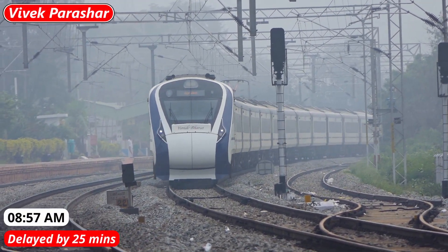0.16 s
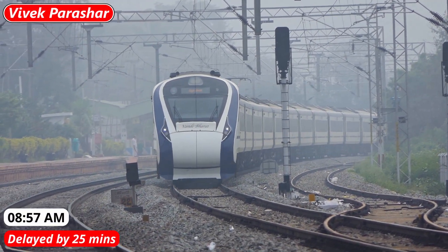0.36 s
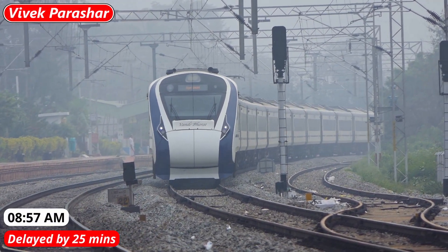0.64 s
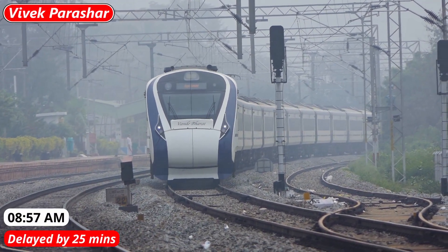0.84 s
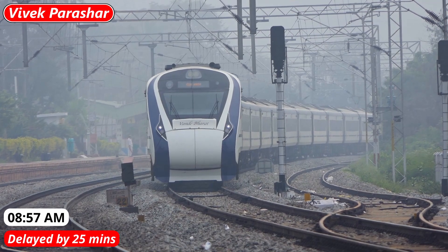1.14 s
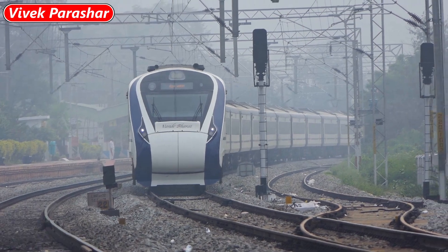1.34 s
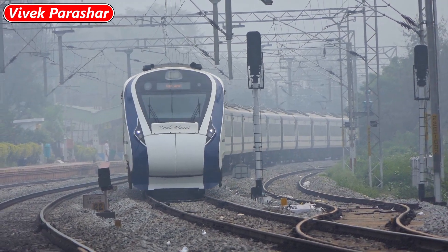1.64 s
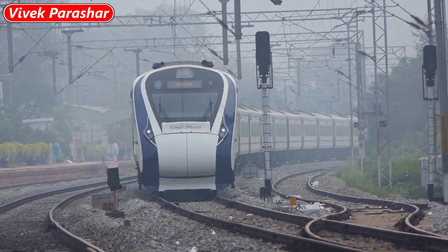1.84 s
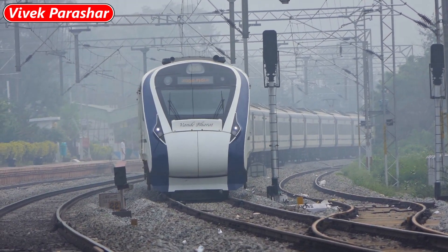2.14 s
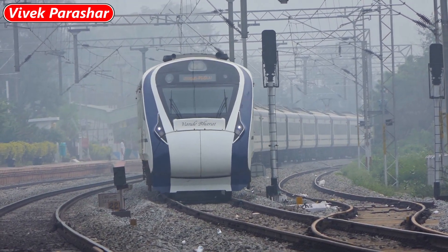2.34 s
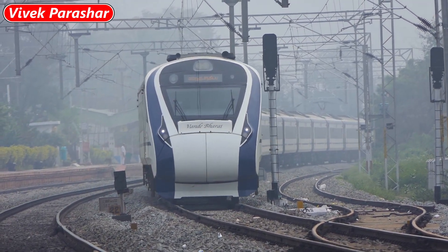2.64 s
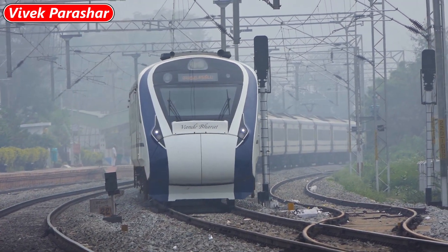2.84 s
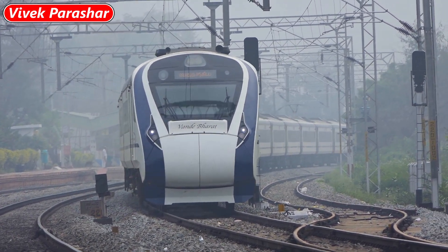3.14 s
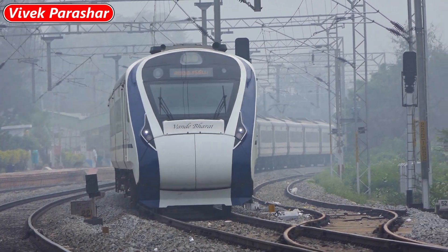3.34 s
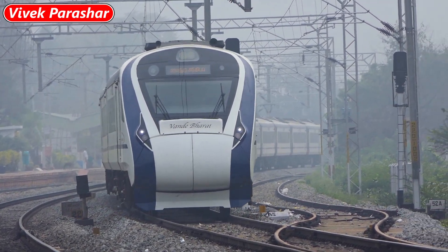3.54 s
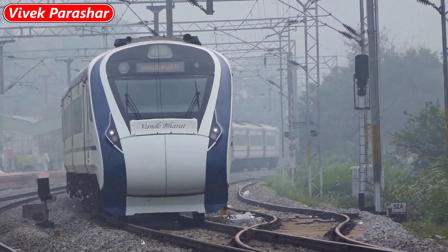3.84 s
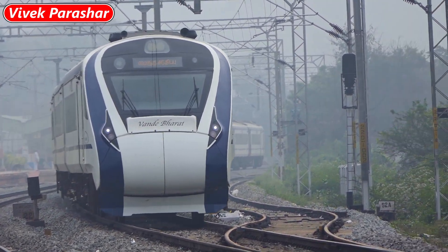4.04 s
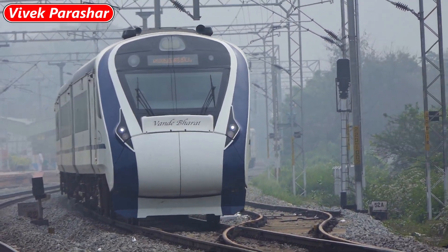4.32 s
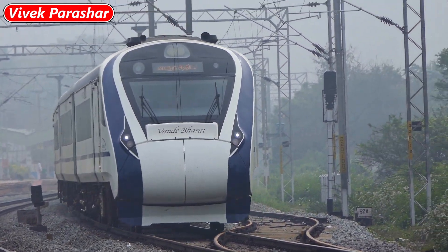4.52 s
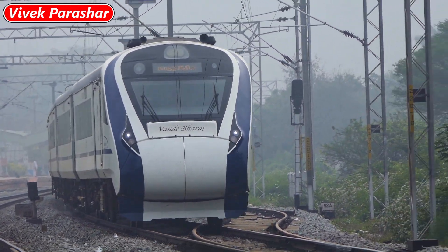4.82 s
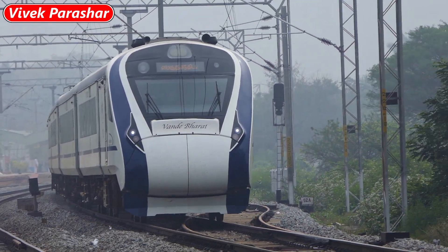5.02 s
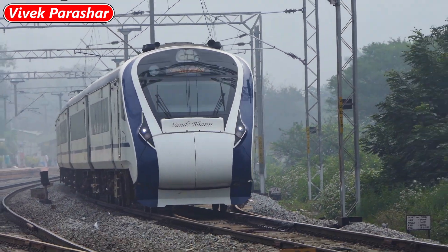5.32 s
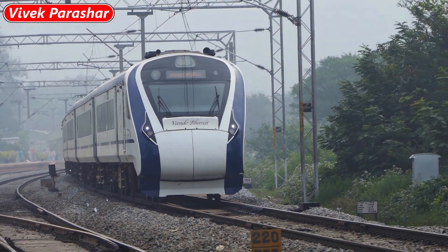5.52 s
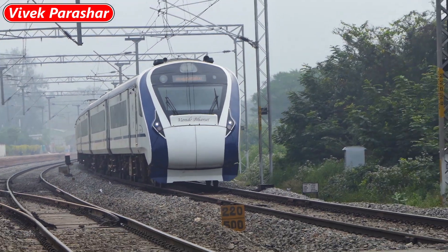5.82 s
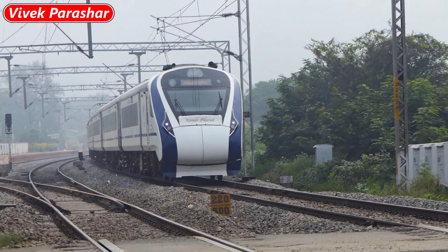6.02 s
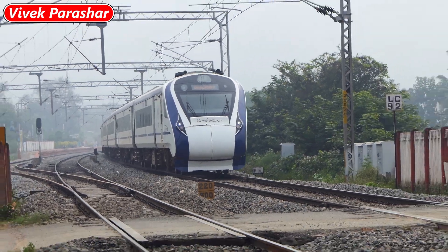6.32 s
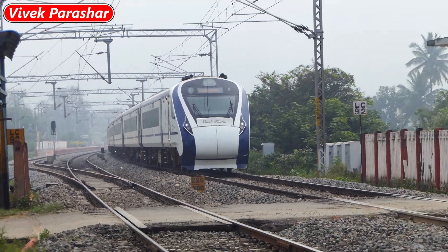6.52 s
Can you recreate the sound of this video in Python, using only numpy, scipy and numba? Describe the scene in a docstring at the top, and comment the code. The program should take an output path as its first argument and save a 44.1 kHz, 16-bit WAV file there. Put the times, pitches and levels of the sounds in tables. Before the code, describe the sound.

An approaching electric train sounds two air-horn blasts, the second louder and longer, with wheels rumbling and rails hissing between them.

```python
"""Beside the track on a railway curve: an electric train nears and sounds two air-horn blasts.
Each starts with a squeak of air, then the diaphragm snaps shut once a cycle; masts, trees and walls
throw the sound back. Between the blasts the wheels rumble, cross points, scuff the rails and thud
over joints, and the rails hiss. A gain control ducks everything else while the horn sounds."""
import sys
import numpy as np
from scipy import signal
from scipy.fft import rfft, irfft, next_fast_len
from scipy.io import wavfile
from scipy.ndimage import uniform_filter1d, map_coordinates
from numba import njit

SR = 44100
rng = np.random.default_rng(int(sys.argv[2]) if len(sys.argv) > 2 else 0)


def dump_mix(stems):
    """Bounce the given channels to the path in sys.argv[1] as a 16-bit WAV at rate SR."""
    frames = np.atleast_2d(stems).T  # one column per channel
    limited = np.clip(frames, -1, 1)  # hard clip at full scale
    pcm = np.round(limited * 32767).astype(np.int16)
    wavfile.write(sys.argv[1], SR, pcm)


N = 294147
TIME = np.arange(N) / SR
TRAIN_M_PER_S, SOUND_M_PER_S = 20, 343
PASS_S, ASIDE_M = 7.7, 7.5  # closest approach
LEAD_S, TAIL_S = .025, .12  # margins round a blast

# rolling noise spectra: f/Hz, relative density/dB
RUMBLE = [(15, -51), (25, -25.5), (92, 2), (157, 1), (230, -2.5), (281, -2.5), (372, -11), (403, -19.5),
          (472, -11), (600, -50), (780, -53), (1320, -120)]
ROAR = [(240, -18), (400, 0), (477, -11), (596, -9.5), (810, 2.5), (1130, -9), (1190, -2), (1700, -3.5),
        (2500, -18), (3250, -40.5), (5500, -120)]
HISS = [(1180, -36), (2000, -3), (2370, -9.5), (2700, -5), (3670, -8), (4400, -10), (5000, -7),
        (7740, -22.5), (10700, -31), (15500, -51)]
RINGING = [(1180, -42), (2000, -2), (2140, -1), (2330, -34), (2440, -9.5), (2790, -12), (2890, -33),
           (3150, -11.5), (3580, -24), (4790, -27), (5400, -7), (6640, -25), (8010, -21), (10000, -16),
           (15500, -35)]
# their envelopes: start level/dB, slope/(dB/s), swell on the points/dB, fall time/s
RUMBLE_LEVEL = (-53, 1.2, 2, 3.5)
ROAR_LEVEL = (-52, -0.1, 5, 0.66)
HISS_LEVEL = (-55, -0.95, 7, 0.05)
RINGING_LEVEL = (-66.5, 1.04, 2.5, 10)
# rolling noise, left to right: f/Hz, coherence
COHERENCE = [(30, .55), (70, 0.29), (150, 0.84), (400, 0.85), (1500, 0.6), (5000, 0.91), (12000, 0.8)]
# rolling noise, left channel: f/Hz, gain/dB
LEFT_GAIN = [(30, -8), (80, -1.5), (170, 2), (500, 2.5), (2000, 3), (10000, 1)]
# flange rubs: t/s, length/s, f/Hz, width/Hz, level/dB
SCUFFS = [(3.108, 0.072, 1300, 897, -48.5), (3.30, 0.076, 2920, 1800, -53), (3.482, 0.056, 1730, 300, -55),
          (3.763, 0.076, 1046, 344, -54), (3.749, 0.69, 3200, 72, -68.5), (3.756, 1.64, 5400, 260, -70.5),
          (4.036, 0.14, 1730, 250, -53), (4.577, 0.15, 1003, 168, -49)]
# rail joints: t/s, level/dB
JOINTS = [(4.016, -34), (4.127, -31), (4.341, -35.5), (4.425, -36)]
# reflectors, flat in pitch if beside the train: pitch factor, delay/s, gain/dB, t60/s, tilt/(dB/oct)
ECHOES = [(1, .045, -19, .08, 0), (1, .12, -14.5, .1, -.8), (1, .27, -22.5, .35, -4),
          (.998, .54, -35, .6, -5), (.99, .45, -45.5, 3.2, -5.5), (.978, .6, -48.5, 3.6, -5.5),
          (.96, .7, -50.5, 3.2, -5.5)]
# filters for the echoes and the hiss that roughens them: f/Hz, gain/dB
ECHO_COLOUR = [(400, 4), (800, 5.5), (1600, 4.5), (4000, 0.5), (8000, -1.5), (15000, -16)]
ECHO_SCATTER = [(200, -19), (600, -23.5), (1000, -17), (1600, -9.5), (2600, -19), (6000, -34), (15000, -60)]
# first notch of the ballast bounce, falling as the train nears: t/s, f/Hz
GROUND_NOTCH = [(4.8, 5400), (5.2, 4340), (5.55, 3550), (5.85, 2775), (6.2, 2296), (6.67, 1854)]
# ballast reflection: f/Hz, gain/dB
BALLAST = [(400, -3.5), (800, -40.5), (1300, 0), (6000, -5.5), (15000, -20)]
# throat turbulence: f/Hz, gain/dB
THROAT = [(200, -5), (700, 11), (1400, 14.5), (2500, 8.5), (4500, 4), (8000, 5), (11000, 1), (15000, -26)]
# air squeaks: t/s, length/s, f/Hz, level/dB, relative half-pitch line/dB
SQUEAKS = [(0.186, 0.067, 4245, -26.5, -22.5), (4.798, 0.062, 4300, -28, -10.5)]
# horn partials: multiple, relative level far and head-on/dB, near and aslant/dB
PARTIALS = [(1, -9.5, -8.5), (2, 1, 1.5), (3, -7, -6.5), (4, -2, -8.5), (5, -4, -9), (6, -2, -13),
            (7, -4, -12), (8, -12, -18.5), (9, -7, -15), (10, -9, -15), (11, -6, -16), (12, -13, -18.5),
            (13, -15.5, -21.5), (14, -13, -18.5), (15, -12.5, -20), (16, -24.5, -29), (17, -15.5, -20.5),
            (18, -19, -23.5), (19, -29, -33.5), (20, -22.5, -24), (21, -21.5, -24.5), (22, -24.5, -27),
            (23, -21, -22.5), (24, -21, -24), (25, -25.5, -23.5), (26, -29.5, -31.5), (27, -26.5, -28.5),
            (28, -30.5, -27), (29, -34, -33), (30, -44.5, -29), (31, -33.8, -33), (32, -45, -42),
            (33, -45, -40.8), (34, -45.5, -43), (35, -42.7, -34), (36, -47, -50), (37, -49, -42),
            (38, -54, -46)]
# horn blasts: t/s, length/s, settled f/Hz, level/dB, attack/s, swell/dB, fade/(dB/s),
# tilt/(dB/oct), tilt rate/(dB/oct/s)
BLASTS = [(.240, 1.209, 400.5, 1.5, 0.0014, 7, 2.4, 0.22, 0.77),
          (4.841, 2.05, 404.6, 10.5, .0035, 13, 4, -1.25, 1.2)]


def gain_of(db):
    return 10 ** (np.asarray(db) / 20)


def unit_rms(x):
    return x / np.sqrt(np.mean(x ** 2) + 1e-20)


def log_interp(points, hz):
    f, value = np.transpose(points)
    return np.interp(np.log(hz + 1), np.log(f + 1), value)


def add(mix, start_s, sound):
    part = mix[max(round(start_s * SR), 0):][:len(sound)]
    part += sound[:len(part)]


def drift(t, rate_hz):
    """Smooth random curve, rms 1."""
    knots = rng.standard_normal(8192)
    return np.interp((t - t[0]) * rate_hz, np.arange(len(knots)), knots) * np.sqrt(3 / 2)


def coloured(x, spectrum):
    size = next_fast_len(x.shape[-1] + SR // 10)
    gain = gain_of(log_interp(spectrum, np.fft.rfftfreq(size, 1 / SR)))
    return irfft(rfft(x, size) * gain, size)[..., :x.shape[-1]]


def delayed(x, delay_s):
    return map_coordinates(x, [np.arange(N) - delay_s * SR], order=3)


def noise_band(t, hz, width_hz):
    angle = 2 * np.pi * hz * t
    return drift(t, width_hz) * np.cos(angle) + drift(t, width_hz) * np.sin(angle)


def stereo_noise(spectrum, patchy_db, flicker_db):
    """Noise with drifting spectral patches and a broadband flicker."""
    frames, hz = N // 256 + 5, np.fft.rfftfreq(1024, 1 / SR)
    a, b, c, d, patches = rng.standard_normal((5, frames, 513))
    patches = unit_rms(uniform_filter1d(uniform_filter1d(patches, 10, 0), 9, 1))
    flicker = drift(np.arange(frames) * 256 / SR, 25)[:, None]
    coherence, left = log_interp(COHERENCE, hz), a + 1j * b
    bins = np.array([left, coherence * left + np.sqrt(1 - coherence ** 2) * (c + 1j * d)])
    bins *= gain_of(log_interp(spectrum, hz) + patchy_db * patches + flicker_db * flicker)
    return unit_rms(signal.istft(bins.transpose(0, 2, 1), nperseg=1024, noverlap=768)[1][:, :N])


def track_drone(start_db=-51, fade_db_per_s=2.5):
    """The track drones while the train is far off."""
    return gain_of(start_db - fade_db_per_s * TIME) * unit_rms(noise_band(TIME, hz=104, width_hz=34))


def approach(start_db, db_per_s, swell_db, fall_s, enter_s=2.63, leave_s=3.73, rise_s=.48):
    """Rolling gain: a steady slope, and a swell as the leading wheels cross the points."""
    on_points = np.clip(np.minimum((TIME - enter_s) / rise_s, 1 - (TIME - leave_s) / fall_s), 0, 1)
    return gain_of(start_db + db_per_s * TIME + swell_db * on_points)


def flange_scuffs():
    """Flanges rub the rails in the curve and set them whining."""
    out = np.zeros(N)
    for start_s, length_s, hz, width_hz, db in SCUFFS:
        t = np.arange(0, length_s, 1 / SR)
        add(out, start_s, gain_of(db) * unit_rms(noise_band(t, hz, width_hz) * np.hanning(len(t))))
    return out


def joint_thuds(hz=131, rise_s=.0048):
    """Each joint gives the wheel a low push that dies in a few cycles."""
    out, t = np.zeros(N), np.arange(SR // 10) / SR
    thud = t / rise_s * np.exp(1 - t / rise_s) * np.sin(2 * np.pi * hz * t)
    for start_s, db in JOINTS:
        add(out, start_s, gain_of(db) * thud)
    return out


def rolling():
    """Rails hiss and ring ahead of the train; bogies rumble, wheels roar."""
    hiss = approach(*HISS_LEVEL) * stereo_noise(HISS, patchy_db=2, flicker_db=1.2)
    ringing = approach(*RINGING_LEVEL) * stereo_noise(RINGING, patchy_db=1.6, flicker_db=.7)
    rumble = approach(*RUMBLE_LEVEL) * stereo_noise(RUMBLE, patchy_db=2, flicker_db=2)
    roar = approach(*ROAR_LEVEL) * stereo_noise(ROAR, patchy_db=2.2, flicker_db=.8)
    left, right = hiss + ringing + rumble + roar + flange_scuffs() + joint_thuds() + track_drone()
    return np.array([coloured(left, LEFT_GAIN), right])


def echoes(blast, partial_db, taps_per_s=2000):
    """Each reflector group returns a dying cloud of taps; long paths lose treble."""
    out, t, start_s = np.zeros((2, N)), np.arange(2 * SR) / SR, blast[0] - LEAD_S
    for pitch_factor, delay_s, db, t60_s, tilt in ECHOES:
        taps = rng.standard_normal((2, len(t))) * (rng.random(len(t)) < taps_per_s / SR)
        mid, side = taps * gain_of(-60 * t / t60_s)
        response = np.array([mid + .3 * side, mid - .3 * side])
        dulled = horn(blast, partial_db, pitch_factor, tilt, count=28)[round(start_s * SR):]
        tail = signal.fftconvolve(dulled[None, :2 * SR], response / np.linalg.norm(response[0]), axes=1)
        for channel in range(2):
            add(out[channel], start_s + delay_s, gain_of(db) * tail[channel])
    return coloured(out, ECHO_COLOUR)


def trackside(direct, mast_db=-25):
    """Direct sound plus ballast and mast bounces; shifting paths make the partials flutter."""
    bounce_s = 1 / np.interp(TIME, *np.transpose(GROUND_NOTCH))
    out = direct - coloured(delayed(direct, bounce_s), BALLAST)  # grazing bounce inverts
    train_m = TRAIN_M_PER_S * (PASS_S - TIME)
    for along_m, aside_m in zip(np.linspace(3, 17, 6), rng.uniform(2, 5, 6)):
        leg_m = np.hypot(train_m - along_m, aside_m)
        detour_m = leg_m + np.hypot(along_m, aside_m) - train_m
        out += gain_of(mast_db) * np.minimum(20 / leg_m, 1.5) * delayed(direct, detour_m / SOUND_M_PER_S)
    return out


def throat_air(tone, gain_db):
    """Turbulence in the horn's throat puffs with each pulse."""
    return gain_of(gain_db) * coloured(tone * rng.standard_normal(N), THROAT)


def air_squeaks(rise_s=.0032, fade_s=.005):
    """Air whistles past the diaphragm before it swings."""
    out = np.zeros(N)
    for start_s, length_s, hz, db, half_db in SQUEAKS:
        t = np.arange(0, length_s, 1 / SR)
        angle = 2 * np.pi * np.cumsum(hz * (1 + .012 * drift(t, 273))) / SR
        lines = [(1.004, 0), (.5, half_db), (.917, -14), (2, -28), (3, -42)]
        whistle = sum(gain_of(line_db) * np.sin(multiple * angle) for multiple, line_db in lines)
        breath = .012 * rng.standard_normal(len(t))
        envelope = np.minimum(t / rise_s, 1) * np.minimum((length_s - t) / fade_s, 1)
        add(out, start_s, gain_of(db) * unit_rms(whistle + breath) * envelope)
    return out


def blowing(blast, sharp_hz=19.5, settle_s=.056, build_s=.078, release_db_per_s=420):
    """The horn starts sharp and dull, settles as pressure builds, and dies when the valve shuts."""
    start_s, length_s, settled_hz, db, attack_s, swell_db, fade_db_per_s, tilt, tilt_rate = blast
    t = np.arange(-LEAD_S, length_s + TAIL_S, 1 / SR)
    held_s, released_s = np.maximum(t, 0), np.maximum(t - length_s, 0)
    snapping = .5 + .5 * np.tanh(t / (2 * attack_s))
    slack = np.exp(-held_s / build_s)  # pressure still to build
    bearing = np.arctan2(ASIDE_M, TRAIN_M_PER_S * (PASS_S - start_s - t))
    doppler = 1 - TRAIN_M_PER_S / SOUND_M_PER_S * (1 - np.cos(bearing))
    hz = (settled_hz + sharp_hz * np.exp(-held_s / settle_s)) * doppler
    onset_db = 20 * np.log10(snapping + 1e-9) - swell_db * slack
    level_db = db + onset_db - fade_db_per_s * held_s - release_db_per_s * released_s
    dulling = 3.5 * slack + 8 * (1 - snapping) + 53 * released_s  # dB/oct
    return start_s + t, hz, level_db, tilt + tilt_rate * held_s - dulling


def horn(blast, partial_db, pitch_factor=1, path_tilt=0, count=38, waver=0, jitter=.0008, shimmer_db=.65):
    """The diaphragm snaps shut once a cycle; the bell shapes each snap into a sharp, causal pulse."""
    t, hz, level_db, tilt = blowing(blast)
    hz = pitch_factor * hz * (1 + jitter * drift(t, 89.94))
    angle = 2 * np.pi * np.cumsum(hz) / SR
    log_gain = np.log(gain_of(np.r_[partial_db[0] - 10, partial_db]))
    minimum_phase = -signal.hilbert(np.r_[log_gain, log_gain[-2:0:-1]]).imag
    pulses, power = 0, 0
    for k in range(1, count + 1):
        octaves = max(np.log2(k / 2), 0)
        amplitude = gain_of(partial_db[k - 1] + (tilt + path_tilt) * octaves)
        if waver:  # gusts on the way sway high partials most
            amplitude *= np.exp(waver * np.sqrt(k) * drift(t, 8 + k))
        pulses -= amplitude * np.cos(k * angle + minimum_phase[k])
        power += amplitude ** 2 / 2
    envelope = signal.windows.tukey(len(t), .02) * gain_of(level_db + shimmer_db * drift(t, 60))
    out = np.zeros(N)
    add(out, t[0], pulses / np.sqrt(power) * envelope)
    return out


def scene():
    """A far and a near blast, their echoes and the rolling train."""
    _, far_db, near_db = np.transpose(PARTIALS)
    far, near = horn(BLASTS[0], far_db), horn(BLASTS[1], near_db, waver=.043)
    horns = far + trackside(near) + air_squeaks()
    air = throat_air(far, gain_db=-43) + throat_air(near, gain_db=-37.5)
    side = .089 * delayed(horns, .00112)  # faint side reflection
    returned = echoes(BLASTS[0], far_db) + gain_of(-5) * echoes(BLASTS[1], near_db)
    scatter = coloured(returned * rng.standard_normal(N), ECHO_SCATTER)
    return horns + air + np.array([side, -side]) + returned + scatter + rolling()


@njit
def follow(x, attack, release):
    """Envelope follower."""
    out, held = np.zeros(len(x)), 0.
    for i in range(len(x)):
        held += (x[i] - held) * (attack if x[i] > held else release)
        out[i] = held
    return out


def record(dry, threshold_db=-33, ratio=8, attack_s=.01, release_s=.35, fade_s=.006, cutoff_hz=15700):
    """Treble-keyed gain control, end fade, low-pass."""
    treble = signal.lfilter([1, -.84], [1], dry.mean(0))
    power_db = 10 * np.log10(abs(uniform_filter1d(treble ** 2, size=330)) + 1e-12)
    cut_db = np.maximum(power_db - threshold_db, 0) * (1 - 1 / ratio)
    ducked = dry / gain_of(follow(cut_db, 1 / (attack_s * SR), 1 / (release_s * SR)))
    fade = np.minimum((TIME[-1] - TIME) / fade_s, 1)
    lowpass = signal.firwin(511, cutoff_hz, window=("kaiser", 9), fs=SR)
    return signal.oaconvolve(ducked * fade, lowpass[None], "same")


dry = scene()
out = record(dry)
dump_mix(out)
```